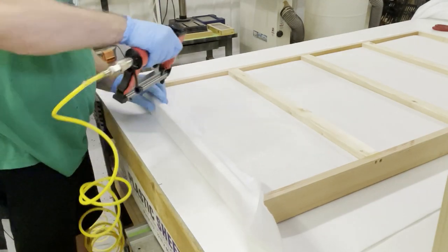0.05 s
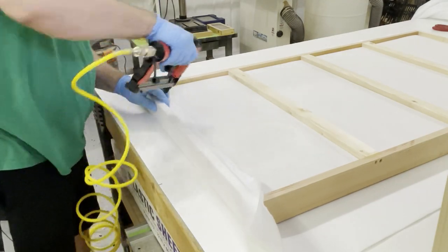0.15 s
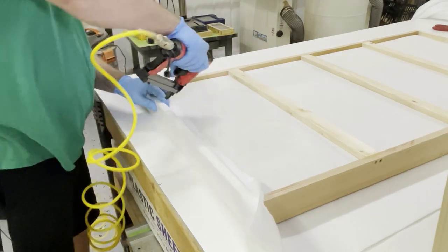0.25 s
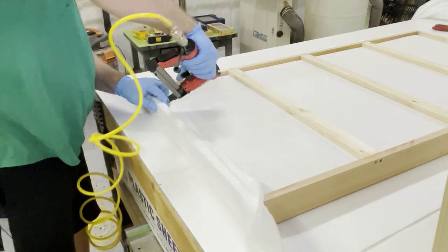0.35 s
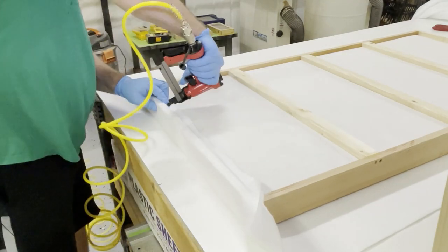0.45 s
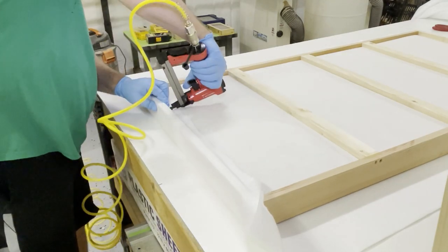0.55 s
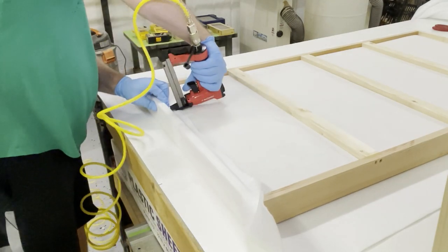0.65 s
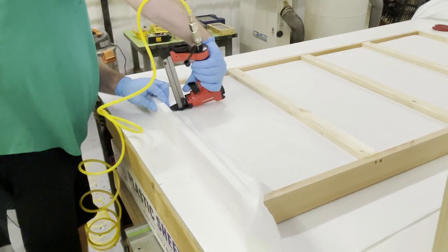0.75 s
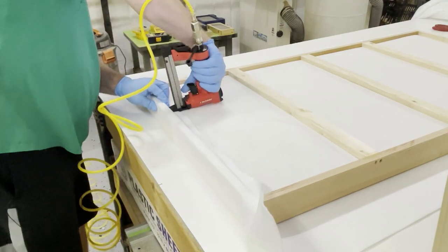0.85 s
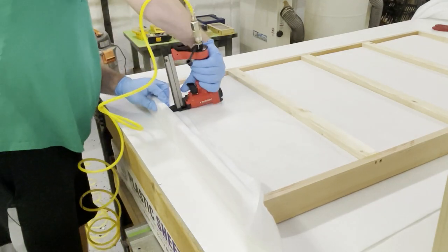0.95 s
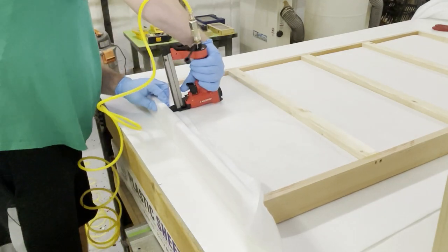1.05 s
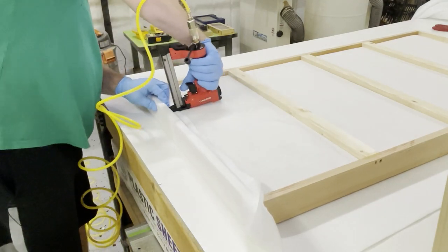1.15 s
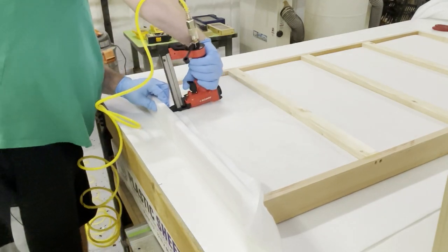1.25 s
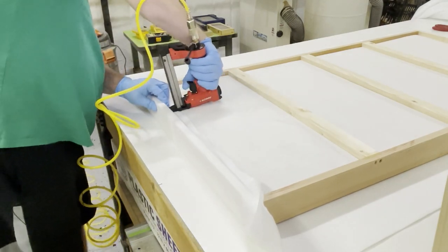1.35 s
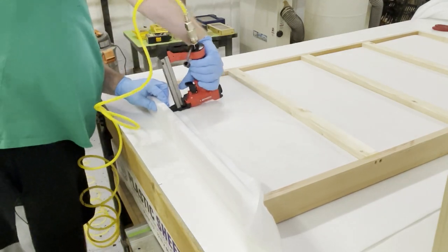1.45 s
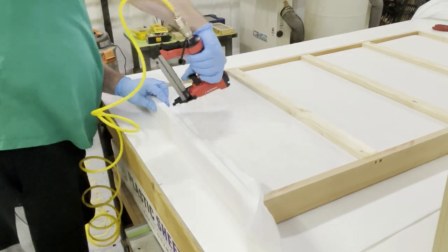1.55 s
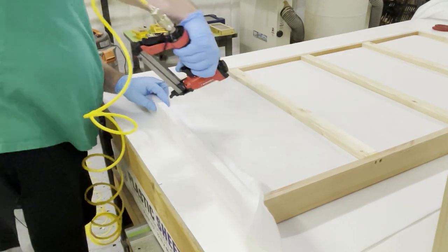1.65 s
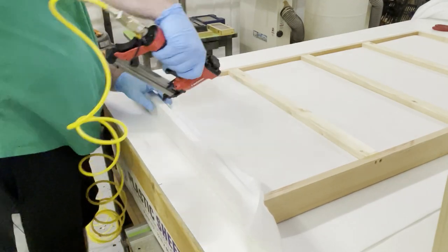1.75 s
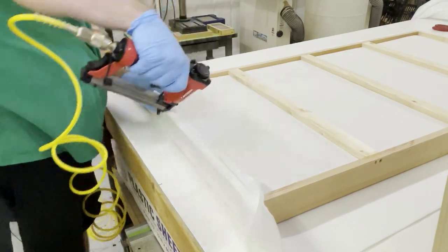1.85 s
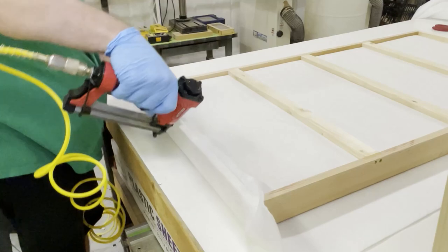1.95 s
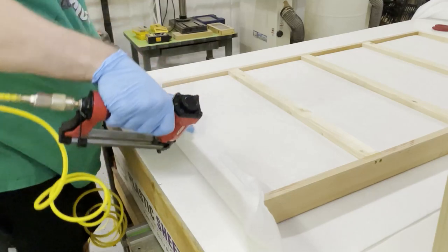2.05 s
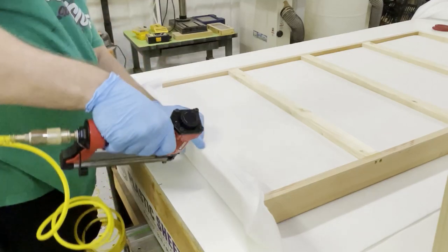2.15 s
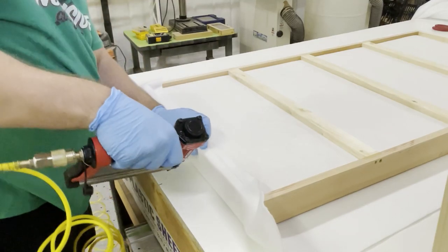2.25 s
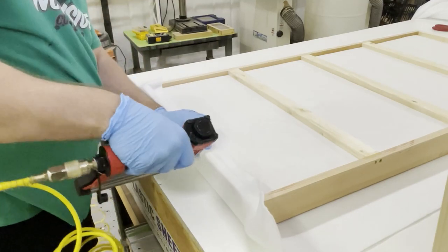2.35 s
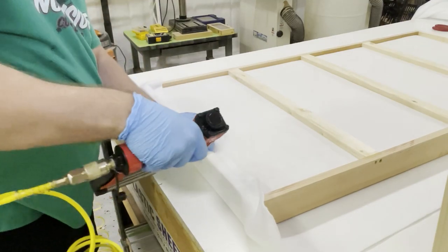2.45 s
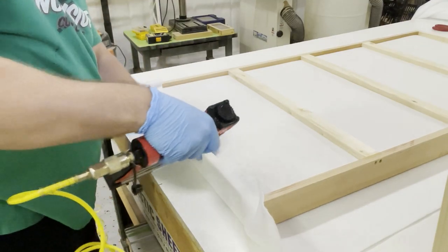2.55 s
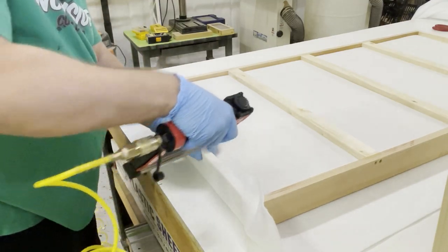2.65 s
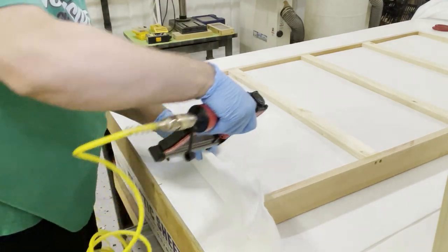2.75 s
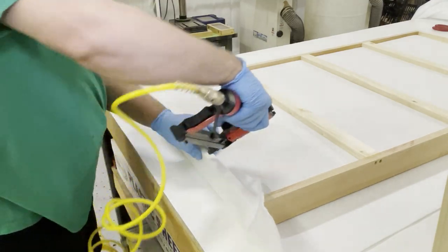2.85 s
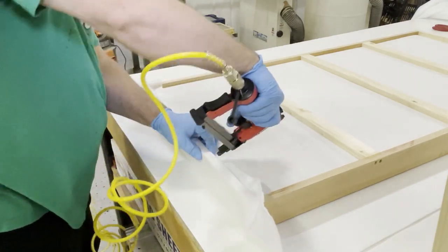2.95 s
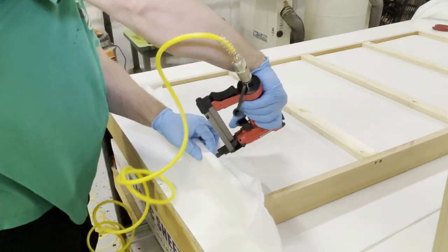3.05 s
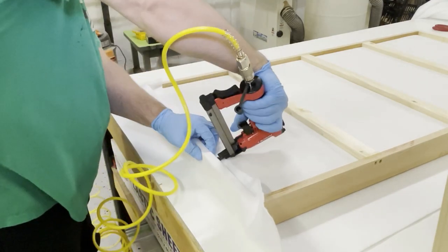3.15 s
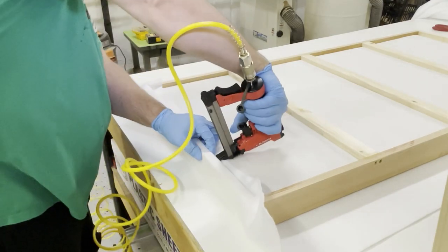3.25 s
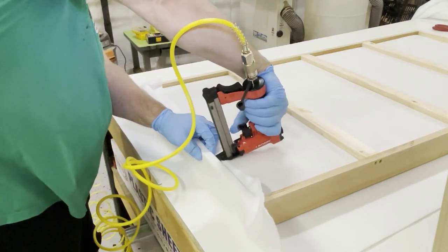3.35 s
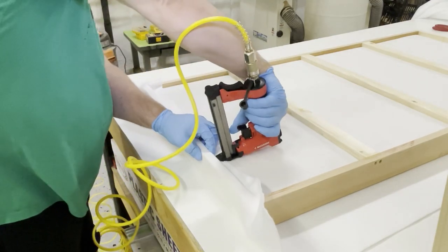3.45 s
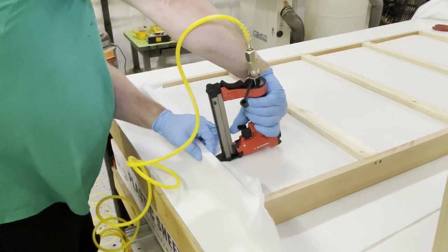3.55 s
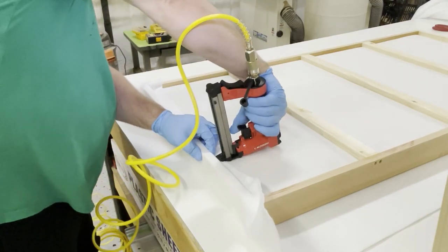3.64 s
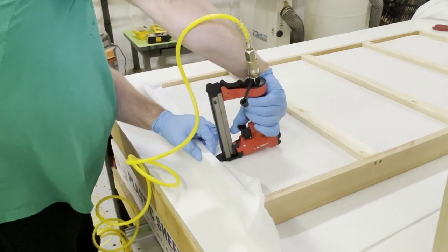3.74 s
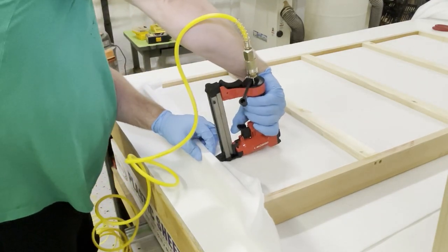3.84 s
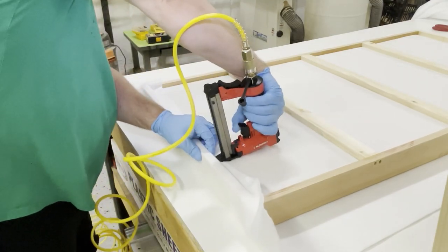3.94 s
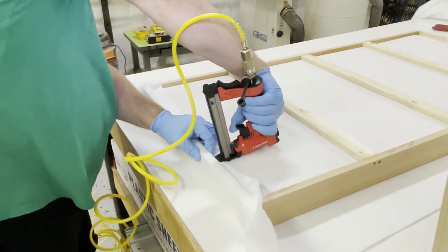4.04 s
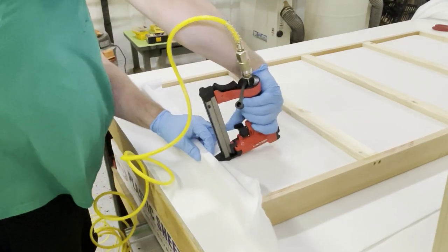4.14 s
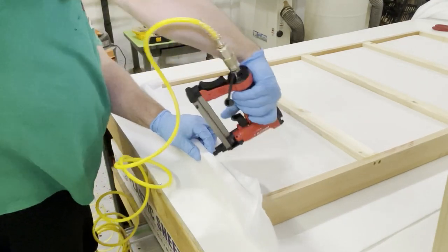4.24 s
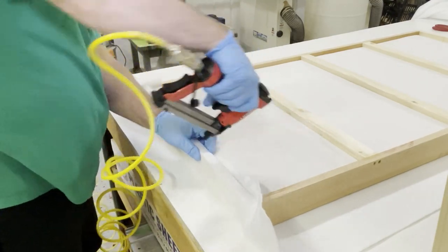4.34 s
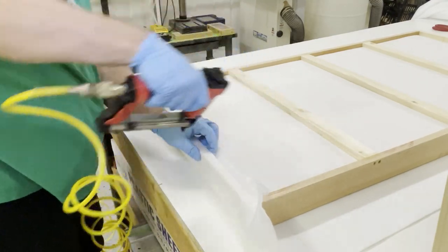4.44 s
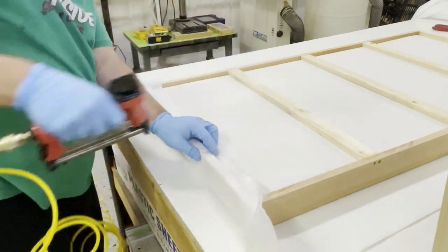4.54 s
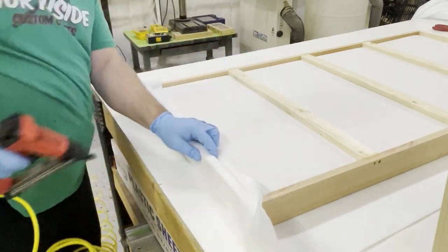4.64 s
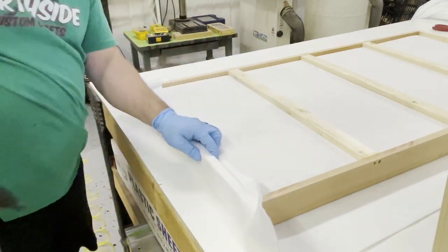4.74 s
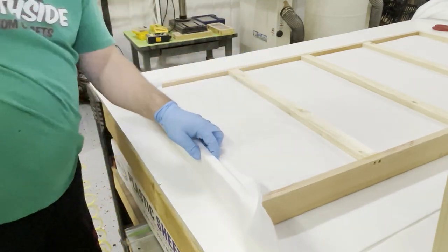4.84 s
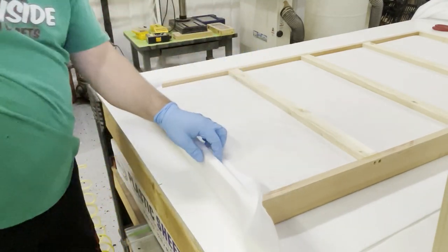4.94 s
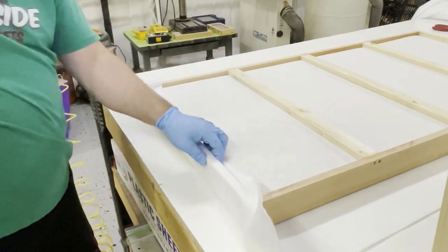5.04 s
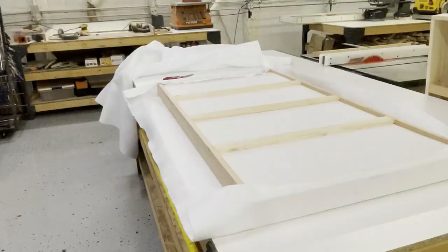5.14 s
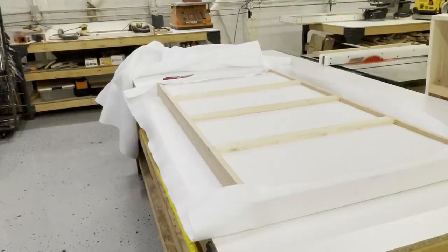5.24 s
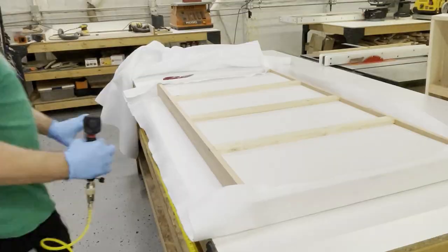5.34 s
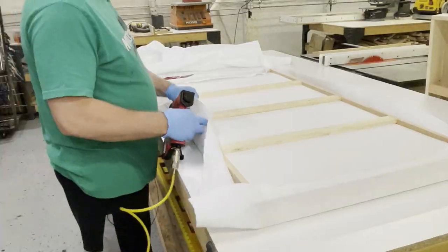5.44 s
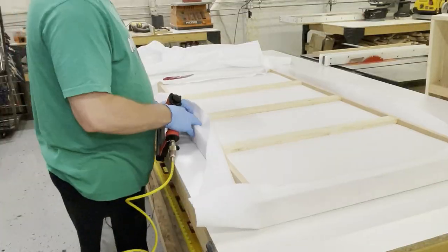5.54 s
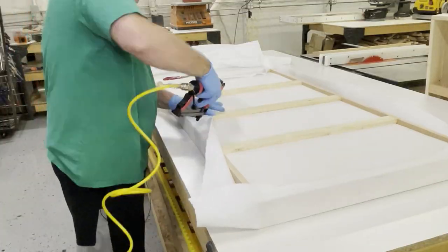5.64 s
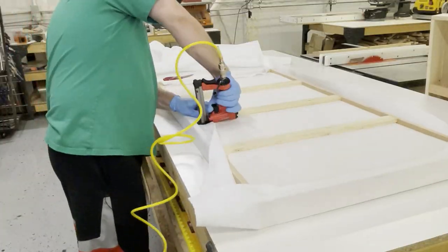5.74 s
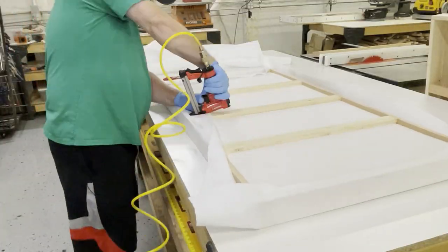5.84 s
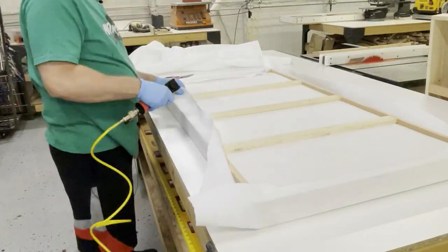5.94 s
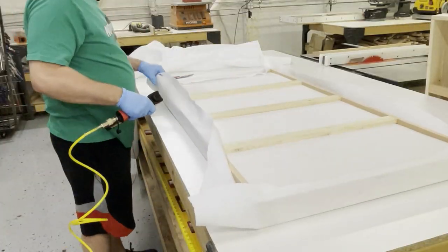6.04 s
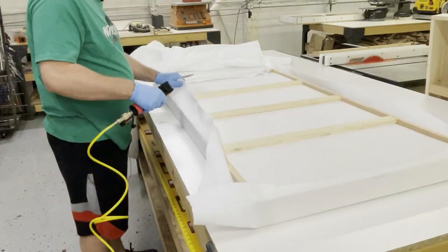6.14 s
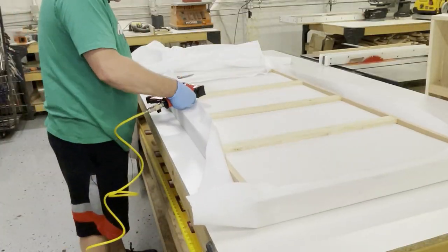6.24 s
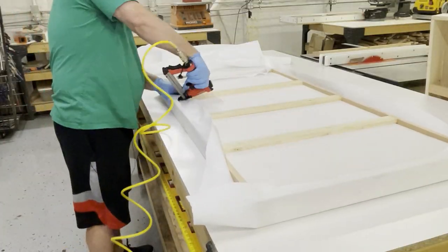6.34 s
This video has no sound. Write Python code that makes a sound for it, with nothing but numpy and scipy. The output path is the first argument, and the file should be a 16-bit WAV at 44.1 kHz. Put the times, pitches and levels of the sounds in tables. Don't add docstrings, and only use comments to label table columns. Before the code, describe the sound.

An air stapler fires two sharp, overloaded cracks amid hissing air and cloth rustle in an echoing workshop, then sped-up clicks, ticks and whines.

```python
import sys
import numpy as np
from scipy import signal
from scipy.fft import rfft, irfft
from scipy.io import wavfile
from scipy.ndimage import map_coordinates

SR = 44100
rng = np.random.default_rng(int(sys.argv[2]) if len(sys.argv) > 2 else 0)


def generate_wav(sig):
    pcm = np.round(np.clip(np.atleast_2d(sig).T, -1, 1) * 32767).astype(np.int16)
    wavfile.write(sys.argv[1], SR, pcm)


def linear_from_db(decibels):
    return 10 ** (np.asarray(decibels, float) / 20)


N = 281799
LEAD_S = .02

# hz, level_db per Hz
EXHAUST = [(1760, -52), (3000, -14.5), (6570, -3.5), (7580, 2), (9530, 2), (14800, -9), (15800, 3),
           (16500, -29)]


def rms_one(x):
    return x / np.sqrt(np.mean(x ** 2) + 1e-20)


def in_time(table):
    s, *columns = np.array(table).T
    return [np.interp(np.arange(N) / SR, s, column) for column in columns]


def at_hz(points, hz):
    points_hz, points_db = np.array(points).T
    return np.interp(np.log(hz + 1), np.log(points_hz), points_db)


def noise(points, size):
    hz = np.fft.rfftfreq(size, 1 / SR)
    spectrum = rfft(rng.standard_normal(size))
    return rms_one(irfft(spectrum * linear_from_db(at_hz(points, hz)), size))


def band(x, low_hz, high_hz):
    edges_hz = [low_hz, min(high_hz, SR / 2 - 500)]
    return signal.sosfilt(signal.butter(2, edges_hz, "band", fs=SR, output="sos"), x)


def drift(rate):
    knots = rng.standard_normal(400)
    return np.interp(np.arange(N) / SR * rate, np.arange(400), knots)


def ring(clicks, hz, t60):
    r, w = linear_from_db(-60 / (max(t60, 1e-3) * SR)), 2 * np.pi * hz / SR
    return signal.lfilter([0, np.sin(w)], [1, -2 * r * np.cos(w), r * r], clicks + 1e-18)


def loss(t60):
    return 2 * np.log(1000) / (max(t60, 1e-3) * SR)


def add(out, x, s):
    at = round(s * SR)
    out[at:at + len(x)] += x[:len(out) - at]


def rumble():
    # hz, level_db per Hz
    room_colour = [(12, -31.5), (20, -15.5), (55, 5.5), (318, -8.5), (527, -11.5), (736, -25.5),
                   (1010, -14), (1140, -34.5), (3000, -34), (3900, -68), (6600, -120)]
    low = noise(room_colour, size=N)
    drone = rms_one(ring(low, 52, 0.57))
    return linear_from_db(-63.5 - 2.25 * drift(3.0)) * (low + linear_from_db(-10.5) * drone)


def leak():
    # start_s, level_db, top_db (aim at the microphone),
    # whistle_db (tool pressed down), shrill_db
    turning = [(0.0, -63.5, -14, -28, 5), (0.22, -68.5, -12, -39, -8), (0.43, -72.5, -24, 0, -6),
               (0.92, -75, -18, 2, 1.5), (1.29, -81.5, -32, 16, 6), (1.46, -48.5, -2.5, -15, -2),
               (1.7, -57.5, -12, -21, -9), (1.96, -60.5, -6.5, -30, -7.5), (2.38, -55.5, -4, -33, -2.5),
               (2.69, -58.5, -6, -29.5, -14.5), (2.86, -60, -6.5, -24.5, 2), (3.2, -61, -5.5, -6.5, 7),
               (3.45, -58.5, -10.5, -13, -1.5), (3.93, -59, -8, -5.5, -6), (4.4, -56.5, -6, -7.5, -3),
               (4.68, -57, -11, -32.5, -4), (4.75, -72, -24, 8, -19.5), (5.16, -78, -24.5, 3.5, -7)]
    # hz, level_db per Hz
    jet_colour = [(1470, -43), (2500, -16.5), (3590, -6.5), (5130, -8), (6250, -6), (7920, -6.5),
                  (10400, -10), (15100, -13.5), (16100, -14), (16500, -41.5)]
    # start_s, pitch_hz
    shrill_ridge = [(0, 9400), (.3, 8200), (.5, 9670), (1.3, 9770), (1.95, 10030), (2.15, 9000),
                    (2.5, 9180), (2.76, 10110), (2.85, 9530), (2.96, 10240), (2.99, 9000), (3.15, 10100),
                    (3.3, 9440), (3.9, 9540), (4.7, 9320)]
    # start_s, hand_ms, table_ms, frame_ms
    extra_path = [(0, .3, 1.1, .6), (.4, .3, .9, 1.3), (1.9, .3, .8, 1.25), (2.1, .42, .88, 1.3),
                  (2.4, .4, 1.0, 1.3), (2.6, .41, .92, 1.24), (2.75, .42, .82, 1.18), (3.0, .42, .7, .95),
                  (3.15, .41, .66, .92), (3.5, .39, .66, 1.0), (3.65, .38, .68, 1.48),
                  (3.9, .365, .72, 1.44), (4.4, .37, .8, 1.1), (4.7, .3, 1.0, 1.5)]

    level_db, top_db, whistle_db, shrill_db = in_time(turning)
    shrill_hz, = in_time(shrill_ridge)
    hiss = noise(jet_colour, size=N)
    hiss += (linear_from_db(top_db + 9.0) - 1) * band(hiss, 6400, 20000)
    hiss += linear_from_db(14 + 3 * top_db) * band(hiss, 9700, 13600)

    ridges = [(3650, whistle_db, 220), (6300, -12, 400), (shrill_hz, shrill_db, 350)]
    for hz, db, half_hz in ridges:
        breadth = rms_one(band(rng.standard_normal(N), 19, half_hz))
        pitch_hz = hz * (1 + .006 * drift(8.3))
        flicker = linear_from_db(db + 1.5 * drift(8.0))
        hiss += flicker * breadth * np.sin(2 * np.pi * np.cumsum(pitch_hz) / SR)
    hiss += linear_from_db(-5.5 + whistle_db + top_db + 24) * band(hiss, 14000, 15000)

    echoes = []
    for ms in in_time(extra_path):
        delay = ms * (1 + .05 * drift(6.)) * SR / 1000
        echoes.append(map_coordinates(hiss, [np.arange(N) - delay], order=3))
    off_hand, off_table, off_frame = echoes
    hand_share = .24 + .35 * np.minimum(linear_from_db(whistle_db), 1)
    table_share = .26 * np.minimum(linear_from_db(top_db + 2.5), 1)
    frame_share = 0.11 * np.minimum(linear_from_db(top_db + 5), 1)
    heard = hiss - hand_share * band(off_hand, 1500, 13000)
    heard += table_share * band(off_table, 5000, 15000)
    heard += frame_share * band(off_frame, 4000, 15000)

    for hz in np.geomspace(4000, 14500, num=10):
        heard += .2 * drift(9) * band(heard, hz * .96, hz * 1.04)
    return linear_from_db(level_db + .8 * drift(15.0)) * heard


def drags(rows):
    rise_s, fall_s, sag_db_per_s, rest_db = .03, .09, 11, -73.5
    t, rub, hollow = np.arange(N) / SR, linear_from_db(rest_db), 0
    for s, end, db, ring_db in rows:
        edge = np.clip(np.minimum((t - s) / rise_s, 1 + (end - t) / fall_s), 0, 1)
        gain = edge * linear_from_db(db - sag_db_per_s * np.maximum(t - s, 0))
        rub = rub + gain
        hollow = hollow + gain * linear_from_db(ring_db)
    return rub, hollow


def cloth():
    # start_s, end_s, level_db, nasal_ring_db
    strokes = [
        (-.05, .38, -58, -0.5),
        (.47, .64, -62, -22),
        (.6, .92, -63.5, 2.5),
        (.9, 1.1, -81, -27),
        (1.22, 1.32, -64, -26.5),
        (1.9, 2.2, -67.5, 8),
        (2.19, 2.84, -57.5, -1),
        (2.93, 3.5, -63.5, -22),
        (3.48, 3.88, -77, -20),
        (4.3, 5.2, -56, -6),
    ]
    # hz, level_db per Hz
    cloth_colour = [(88, -38), (150, -10), (306, -9.5), (485, 1), (1030, -4.5), (1140, -6.5), (1410, -2.5),
                    (1960, -13), (2870, -22), (3500, -18.5), (4550, -40), (7700, -120)]
    # start_s, pitch_hz
    hollow_pitch = [(.9, 1406), (2.2, 1493), (3.0, 1493), (4.7, 1437)]

    rub, nasal = drags(strokes)
    phase = 2 * np.pi * np.cumsum(in_time(hollow_pitch)[0]) / SR
    first = rms_one(band(rng.standard_normal(N), 6, 40))
    second = rms_one(band(rng.standard_normal(N), 6, 40))
    hollow = first * np.sin(phase) + 0.57 * second * np.sin(0.9 * phase)
    return linear_from_db(1.2 * drift(8.9)) * (rub * noise(cloth_colour, size=N) + nasal * hollow)


def bumps():
    # start_s, peak_db, pitch_hz, click_db
    touches = [(0.488, -41.5, 432, -1), (0.561, -47.5, 217, -16), (0.719, -44.5, 213, -29),
               (1.223, -61, 266, 1), (2.199, -48.5, 605, -8), (2.657, -45, 191, -4),
               (2.942, -46.5, 458, 0.5), (3.147, -44.5, 304, 2), (3.261, -43.5, 235, -12),
               (3.272, -45.5, 211, -16), (3.407, -55, 389, -25), (3.43, -48, 578, -39),
               (3.454, -42.5, 153, -37), (3.479, -47, 153, -33), (3.839, -65, 237, 1),
               (4.632, -42, 235, -12), (4.659, -36.5, 221, -5.5)]
    # start_s, pitch_hz, level_db, t60_s
    magazine = (.5, 2450, -69, 1.3)

    out, t = np.zeros(N), np.arange(SR // 4) / SR
    for s, db, hz, click_db in touches:
        t60 = .08 * linear_from_db(-20 * (click_db + 2.5) / (4 * 25))
        rough = rms_one(band(rng.standard_normal(len(t)), hz * 0.56, hz * 1.43))
        rough *= linear_from_db(-60 * t / t60) * np.minimum(t / 0.0037, 1)
        click = rms_one(band(rng.standard_normal(len(t)), 600, 2300))
        click *= linear_from_db(click_db - 60 * t / 0.043)
        add(out, linear_from_db(db - 5.0) * (rough + click), s)
        add(out, linear_from_db(db - 9) * ring(signal.unit_impulse(len(t)), hz, 1.1 * t60), s)
    s, hz, db, t60 = magazine
    add(out, linear_from_db(db) * ring(signal.unit_impulse(SR // 2), hz, t60), s)
    return out


def whines():
    # start_s, length_s, first_hz, last_hz, level_db
    motors = [(5.06, .37, 830, 815, -75), (6.14, .32, 670, 945, -75), (5.33, .21, 1960, 1925, -71),
              (5.98, .17, 1770, 1765, -77), (6.16, .11, 1540, 1860, -76), (6.265, .14, 1790, 1850, -65),
              (5.15, .11, 3545, 3560, -71), (5.26, .22, 3540, 3510, -83), (6.17, .3, 3220, 3430, -80),
              (6.26, .16, 2930, 3070, -83), (6.18, .07, 2480, 2530, -81)]
    out, t = np.zeros(N), np.arange(N) / SR
    for s, length, first_hz, last_hz, db in motors:
        done = np.clip((t - s) / length, 0, 1)
        hz = last_hz + (first_hz - last_hz) * np.exp(-done / .3)
        swell = np.maximum(np.sin(np.pi * done), 0) ** .45 * (done < 1)
        level = linear_from_db(db + 4 + 3 * drift(50.))
        hz = hz * (1 + .006 * drift(55.))
        out += swell * level * np.sin(2 * np.pi * np.cumsum(hz) / SR)
    return out


def fast_rustle():
    # hz, level_db per Hz
    fast_colour = [(18, -28.5), (30, -20), (217, -24), (953, -16), (1090, -15.5), (1240, -16.5),
                   (1750, -15), (5590, -25), (6550, -24), (15700, -16.5), (16500, -40)]
    # middle_s, half_length_s, lift_db
    rustles = [(5.222, 0.038, 5.5), (5.353, 0.047, 2), (5.453, 0.036, 2.5), (5.534, 0.052, 2.5),
               (5.62, 0.023, 3), (5.68, 0.014, 4.5), (5.761, 0.023, 3), (5.908, 0.025, 3.5),
               (6.006, 0.018, 3.5), (6.067, 0.027, 3), (6.126, 0.022, 2), (6.195, .014, 3),
               (6.337, 0.037, 2.5)]
    t = np.arange(N) / SR
    lift_db = sum(db * np.exp(-((t - s) / half) ** 2) for s, half, db in rustles)
    floor = noise(fast_colour, size=N)
    top_db = -11.5 + 2.55 * lift_db + 3.5 * drift(60.)
    return linear_from_db(-69 + lift_db) * (band(floor, 15, 4900) - linear_from_db(top_db) * band(floor, 4900, 21500))


def fast_ticks():
    # start_s, peak_db, pitch_hz, ring_db
    ticks = [(5.1753, -36, 5140, -22), (5.1804, -35, 3540, -24.5), (5.1974, -48, 3560, -17.5),
             (5.201, -45.5, 3540, -14), (5.238, -39, 1386, -22), (5.2632, -43, 3450, -20),
             (5.278, -37, 2300, -21), (5.3314, -45.5, 1927, -19), (5.3654, -39.5, 1960, -24.5),
             (5.4074, -44, 1936, -14), (5.4364, -41.5, 1924, -15.5), (5.467, -37.5, 2324, -7),
             (5.4989, -43.5, 1897, -11.5), (5.5147, -42.5, 1450, -5), (5.5385, -39.5, 2240, -15),
             (5.5545, -33, 2310, -1), (5.571, -42, 2310, -5), (5.6006, -46, 1450, -11),
             (5.6614, -43, 2260, -4), (5.6712, -34.5, 2320, -7.5), (5.675, -35.5, 1780, -9),
             (5.741, -47.5, 2290, -5.5), (5.8937, -46, 2326, -15), (5.9134, -46, 1630, -11),
             (6.183, -48.5, 1610, -13), (6.2724, -46, 1860, -9), (6.3503, -42, 1830, -12.5),
             (6.3592, -42.5, 1870, -11), (5.5265, -43, 2320, -24), (5.7955, -46, 5000, -26),
             (5.930, -46, 6000, -26.5), (5.940, -47, 6000, -24), (6.160, -50.5, 5000, -25)]
    out, t = np.zeros(N), np.arange(SR // 10) / SR
    for s, db, hz, ring_db in ticks:
        crackle = band(rng.standard_normal(len(t)), 1200, 9100)
        tick = crackle + linear_from_db(ring_db) * rms_one(band(crackle, 1150, hz * 1.53))
        struck = ring(crackle * linear_from_db(-60 * t / 0.0053), hz, 0.047)
        add(out, linear_from_db(db - 16 + ring_db) * struck / np.max(np.abs(struck)), s)
        t60 = .008 + .03 * linear_from_db(ring_db)
        add(out, linear_from_db(db - 10 - 60 * t / t60) * tick, s)
    return out


def echo(colour, peaks, build_s, size):
    # hz, t60_s
    hall = [(60, .9), (250, 1.4), (1200, 1.413), (2000, 1.433), (2900, 1.3), (5400, 0.77), (11000, 0.16),
            (16000, 0.69)]
    t, hz = np.arange(size) / SR, np.fft.rfftfreq(size, 1 / SR)
    resonance = 1 + sum(linear_from_db(db) / (1 + (2 * (hz - top) / width) ** 2) for top, width, db in peaks)
    spectrum = rfft(rng.standard_normal(size)) * linear_from_db(at_hz(colour, hz)) * resonance
    out = np.zeros(size)
    for centre in 31 * 2 ** np.arange(0, 9.5, .5):
        share = np.cos(np.pi * np.clip(np.log2((hz + 1) / centre), -.5, .5)) ** 2
        out += irfft(spectrum * share, size) * linear_from_db(-60 * t / at_hz(hall, centre))
    return out / np.std(out[:SR // 10]) * (1 - np.exp(-t / build_s))


def blow(t, push, drive_s, steel_db, place):
    # pitch_hz, first_place_db, second_place_db, t60_s
    wood_modes = [(111, -4.5, -6, 0.092), (305, -6.5, -7, 0.026), (470, -8.5, -11.5, 0.072),
                  (629, -0.5, -4, 0.03), (796, -8.5, -1, 0.023), (933, -9.5, -7, 0.08),
                  (1228, 0, 2.5, 0.011), (1586, -3, -6.5, 0.016), (1780, -10.5, -4.5, 0.014),
                  (2030, -5.5, -14, 0.012)]
    # pitch_hz, level_db, t60_s
    steel_modes = [(2826, -1, 0.036), (3390, 3.5, 0.038), (4356, -7.5, 0.04), (5660, 13, 0.0058),
                   (8200, -3.5, 0.015)]
    crack_length = (.0058, .0025)

    chatter = rng.standard_normal(len(t)) * (rng.random(len(t)) < .14)
    chatter *= 1.7 * (t > .001) * (t < drive_s)
    soft = 3 * band(chatter, 600, 1800) + linear_from_db(-2.5 - 2.1 * place) * band(chatter, 110, 540)
    soft *= np.exp(-place * t / 0.0045)
    wood = sum(linear_from_db(db[round(place)]) * ring(soft, hz, t60) for hz, *db, t60 in wood_modes)
    hard = chatter * (t > .0022) * np.exp(-t / 0.0022)
    steel = sum(linear_from_db(db) * ring(hard, hz, t60) for hz, db, t60 in steel_modes)
    crack = chatter * np.clip((t - .001) / .0008, 0, 1) * np.exp(-t / crack_length[round(place)])
    out = linear_from_db(-5 * place) * wood + linear_from_db(steel_db) * steel
    out += linear_from_db(steel_db + 14.5 - 4 * place) * band(crack, 7000, 26000)
    out *= linear_from_db(1.5) / np.std(out[(t > 0) & (t < drive_s)])
    out += linear_from_db(10) * ring(push, 880, .011)
    return out * linear_from_db(-17 * np.clip((t - drive_s) / .0012, 0, 1))


def exhaust(t):
    gust = np.interp(t + LEAD_S, [0, .002, .004, .0085, .0115, .015, .0175, .024],
                     [0, .3, 1, .9, .5, .6, .22, .15])
    gust = gust * np.exp(-np.maximum(t, 0) / 0.0054)
    jet = noise(EXHAUST, size=len(t))
    jet += linear_from_db(-2.5) * rms_one(band(rng.standard_normal(len(t)), 81, 505))
    jet += linear_from_db(-13) * rms_one(band(rng.standard_normal(len(t)), 570, 2800))
    return gust * jet


def piston_knock(size):
    hit = signal.lfilter([.2], [1, -.8], signal.unit_impulse(size))
    low = -ring(hit, 1500, .008) - .2 * ring(hit, 520, .015)
    return low - .45 * ring(hit, 3000, .003) - .6 * ring(hit, 6000, .003)


def staple(drive_s, exhaust_s, knock_s, steel_db, echo_db, exhaust_db, place):
    # delay_s, pitch_hz, t60_s, first_place_db, second_place_db
    rebound = (.0140, 870, .045, -7, -22)
    # hz, level_db per Hz
    blow_colour = [(24, -44), (40, -12.5), (69, -11), (249, -5.5), (329, -8), (467, -8.5), (715, -11),
                   (918, -4), (2320, -13), (2980, -12.5), (3300, -18.5), (3650, -14.5), (16000, -32.5)]
    # pitch_hz, width_hz, first_staple_db, second_staple_db
    echo_peaks = [(483, 52, 8.5, 6.5), (600, 65, 6.5, -9), (812, 48, 1.5, 4.5), (910, 140, 4, -5.5),
                  (1372.3, 96, 2, 8), (1730, 170, -1, 4.5), (2020, 80, 8, -10), (2970, 940, 2.5, 0.5),
                  (3590, 120, 3, 5)]
    # after_exhaust_s, under_knock_db
    rattles = [
        [(.0063, -36), (.0116, -10.5)],
        [(.0098, -16), (.0116, -9)],
    ]

    size = 2 * SR
    out, t = np.zeros(size), np.arange(SR // 4) / SR - LEAD_S
    valve = linear_from_db(-27) * band(rng.standard_normal(len(t)), 3000, 12000)
    valve *= np.exp(np.minimum(t, 0) / .007) * (t < .002)
    push = signal.lfilter([.0049], [1, -1.86, .8649], signal.unit_impulse(len(t), round(LEAD_S * SR)))
    splash = linear_from_db(-25.0) * noise(EXHAUST, size=len(t)) * (t > .001)
    splash *= np.exp(-t / 0.0074) + linear_from_db(-22) * np.exp(-t / 0.16)
    add(out, valve + blow(t, push, drive_s, steel_db, place) + splash, 0)

    delay_s, hz, t60, *db = rebound
    spring = ring(ring(push, hz, t60) * loss(t60), hz * 1.04, t60)
    add(out, linear_from_db(db[round(place)] + 6) * spring, delay_s)
    peaks = [(hz, width, (first_db, second_db)[round(place)])
             for hz, width, first_db, second_db in echo_peaks]
    add(out, linear_from_db(echo_db) * echo(blow_colour, peaks, 0.002, size=size), LEAD_S + 0.0023)

    opens_s = LEAD_S + exhaust_s
    add(out, linear_from_db(exhaust_db) * exhaust(t), opens_s)
    add(out, -linear_from_db(exhaust_db - 21) * ring(push, 81.1, 0.23), exhaust_s + 0.0017)
    add(out, linear_from_db(exhaust_db - 22) * echo(EXHAUST, [], 0.0074, size=SR), opens_s + 0.0017)

    knock = piston_knock(len(t))
    add(out, linear_from_db(exhaust_db + 14) * knock, opens_s + knock_s)
    for s, db in rattles[round(place)]:
        add(out, -linear_from_db(exhaust_db + 15 + db) * knock, opens_s + s)
    add(out, linear_from_db(exhaust_db + 5) * knock, opens_s + knock_s + .0025)
    hot = out / .92
    return out / (1 + np.abs(hot) ** 4) ** (1 / 4)


def fast_staples():
    # blow_s, then at true speed drive_s, exhaust_delay_s, knock_after_exhaust_s
    fast_shots = [
        (5.8176, .009, .118, .0195),
        (5.9531, .009, .119, .0195),
    ]
    # echo_db, exhaust_db
    fast_levels = [
        (0, 0.5, -37, 2160, 2.5, 7000, 3, -25.5, -14),
        (0, -0.5, -30.5, 345, 6, 3700, 2.4, -25, -14),
    ]
    speed_up = 17
    out = np.zeros(N)
    for (s, *timing), row in zip(fast_shots, fast_levels):
        db, crack_db, thump_db, low_hz, low_db, high_hz, high_db, echo_db, exhaust_db = row
        quick = staple(*timing, 0, echo_db, exhaust_db, 0)[::speed_up]
        t = np.arange(len(quick)) / SR
        quick *= np.clip(t / .0015, 0, 1) ** 3
        crack = quick * (t < .003)
        quick += linear_from_db(low_db) * band(crack, low_hz * 0.6, low_hz * 1.84)
        quick += linear_from_db(high_db) * band(crack, high_hz * 0.61, high_hz * 1.07)
        quick *= np.where(t < .0022, linear_from_db(crack_db), 1)
        thump = ring(signal.unit_impulse(SR // 10), 170, .04)
        add(quick, linear_from_db(thump_db) * thump, LEAD_S / speed_up)
        quick *= linear_from_db(-150 * t)
        add(out, linear_from_db(db) * quick, s - LEAD_S / speed_up)
    return out


def scene():
    # blow_s, drive_s, exhaust_delay_s, knock_after_exhaust_s
    shots = [
        (1.3053, .0106, .1228, .0197),
        (3.9612, .0090, .1350, .0197),
    ]
    # steel_db, echo_db, exhaust_db, place along the frame (0-1)
    shot_levels = [
        (-2, -22.5, -15, 0.17),
        (3, -25.5, -13.5, 0.91),
    ]
    change_s, mic_hiss_db = 5.16, -75
    slow = rumble() + leak() + cloth() + bumps()
    slow += linear_from_db(mic_hiss_db) * rng.standard_normal(N)
    for (s, *timing), levels in zip(shots, shot_levels):
        add(slow, staple(*timing, *levels), s - LEAD_S)
    fast = whines() + fast_rustle() + fast_ticks() + fast_staples()
    return np.where(np.arange(N) < change_s * SR, slow, fast)[None]


def roll_off(x):
    return signal.sosfilt(signal.butter(12, 16780, fs=SR, output="sos"), x)


def record(dry):
    mix = signal.sosfilt(signal.cheby2(10, 50, 16600, fs=SR, output="sos"), dry)
    return roll_off(mix)


dry = scene()
out = record(dry)
generate_wav(out)
```